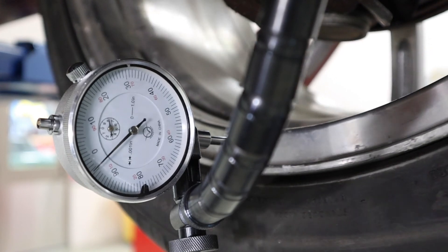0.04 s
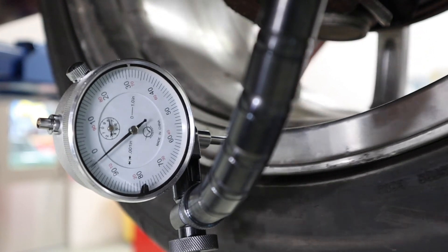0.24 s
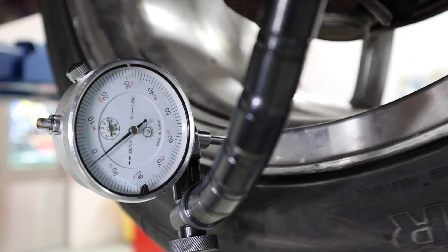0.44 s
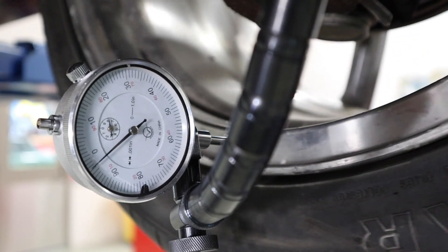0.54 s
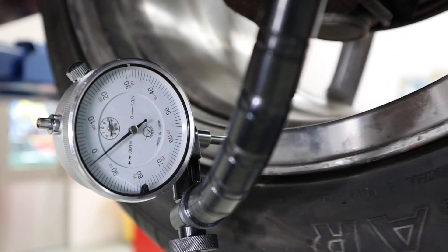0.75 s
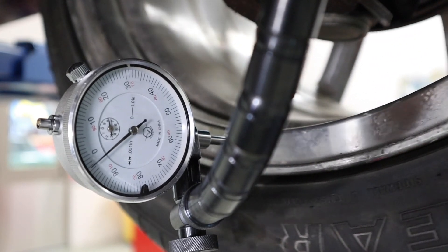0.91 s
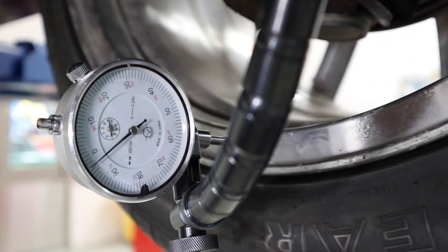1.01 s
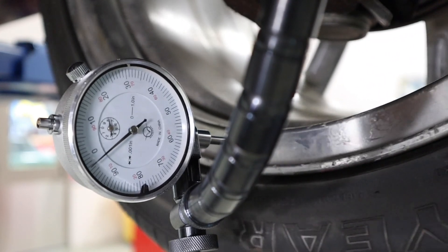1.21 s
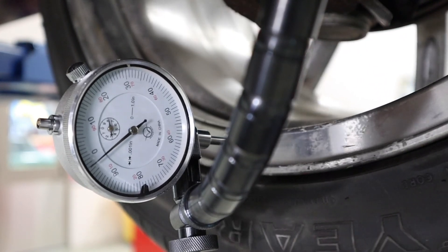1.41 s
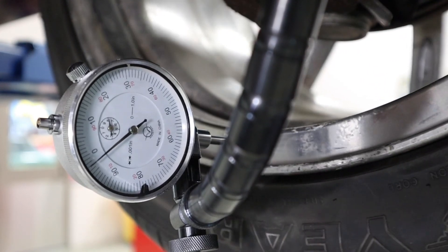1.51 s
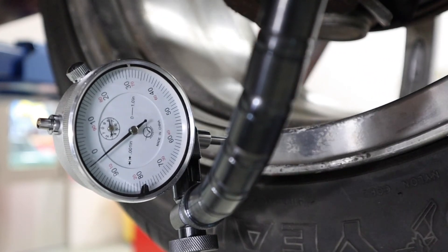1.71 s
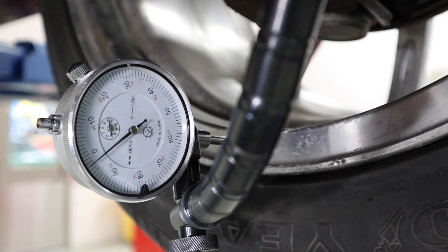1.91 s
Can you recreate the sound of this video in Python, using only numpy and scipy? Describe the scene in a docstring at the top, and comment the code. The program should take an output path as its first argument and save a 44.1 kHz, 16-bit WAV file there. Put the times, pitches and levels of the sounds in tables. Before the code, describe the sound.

Rasping metal scrapes from a hand-turned wheel against a gauge, over a soft low rumble.

```python
"""Car wheel under a dial gauge

A car wheel is turned by hand in a quiet workshop, a dial gauge riding on its rim. Five times the
contact catches and scrapes: stick-slip friction excites the modes of rim and gauge, and hard grains
ping. Around the scrapes the tip ticks over small flaws, while the hub rumbles and rubs softly."""
import sys
import numpy as np
from scipy import signal
from scipy.fft import rfft, irfft
from scipy.io import wavfile

SR = 44100
rng = np.random.default_rng(int(sys.argv[2]) if len(sys.argv) > 2 else 0)


def bounce(signal):
    """Save signal as a 16-bit WAV file at the path given by the first command-line argument."""
    frames = np.transpose(np.atleast_2d(signal))
    limited = np.clip(frames, -1, 1)
    pcm = np.round(limited * 32767).astype(np.int16)
    wavfile.write(sys.argv[1], SR, pcm)


N = 85995
T = np.arange(N) / SR


def scrapes():
    """Forced vibration: friction drives the metal's sharp modes, broad resonances and gritty treble."""
    # broad response of the scraped metal: f/Hz, relative level/dB
    body_spectrum = [(100, -25.5), (420, -18.5), (600, -28), (780, -22.5), (1000, -7), (1140, -21.5),
                     (1340, -4.5), (1620, -8.5), (2000, -5), (2540, -5), (2790, -10), (3050, -7.5),
                     (3700, -13.5), (4480, -9), (5200, -20.5), (6350, -18), (7100, -41.5), (8200, -53.5),
                     (11000, -52), (16000, -67)]
    # spectrum of the fine grit: f/Hz, relative level/dB
    grit_spectrum = [(2000, -18), (4400, 3), (6300, 4), (8000, -25), (9200, -18), (10000, -5),
                     (11000, -13.5), (11900, -1), (12700, -7), (13600, -4), (16000, -16)]
    force, bite, groan, grit = scrape_envelopes()
    pulses, slip_tone = stick_slip()
    metal = metal_modes(force * friction(pulses))
    metal += amp(-22) * colour(force * friction(pulses), body_spectrum)
    metal += resonate(bite * friction(pulses), hz=2163, width_hz=720)
    metal += resonate(groan * friction(pulses), hz=1335, width_hz=177)
    metal += amp(-37) * colour(grit * micro_slips(per_s=7500, spread_db=4), grit_spectrum)
    return metal + amp(-41) * np.sqrt(force) * slip_tone


def scrape_envelopes():
    """Exponential decay and growth: each scrape opens with a harsh bite, then a lower groan builds."""
    # strength of the slipping, one curve per scrape: t/s, level/dB
    curves = [
        [(.24, -4), (.244, -9), (.246, -2), (.266, 0.5), (.274, 0.5), (.342, 0.5), (.357, -3.5), (.368, -20),
         (.40, -19)],
        [(.459, -5), (.482, -4), (.493, -16), (.516, -8)],
        [(.519, -9.5), (.527, -1.5), (.556, 2.5), (.568, -5.5), (.587, 1), (.604, -28), (.63, -34)],
        [(.652, -26), (.661, -4.5), (.678, 1.5), (.714, -0.5), (.728, -5), (.742, -32)],
        [(.764, -6), (.769, -0.5), (.786, 2), (.822, -1), (.865, -1), (.9, -2), (.948, -2), (.966, -10),
         (.99, -22)],
    ]
    # bite and groan relative to that strength, one entry per scrape: level/dB
    bite_levels = [-16, -18, -16.5, -19.5, -22.5]
    groan_levels = [-26, -24, -20, -24, -21.5]
    bite_decay_s, groan_build_s, grit_build_s = .045, .068, .0079
    force, bite, groan, grit = np.zeros((4, N))
    for curve, bite_db, groan_db in zip(curves, bite_levels, groan_levels):
        times, db = np.transpose(curve)
        level = amp(np.interp(T, times, db, left=-120, right=-120))
        age = np.maximum(T - times[0], 0)
        force += level
        bite += level * amp(bite_db) * np.exp(-age / bite_decay_s)
        groan += level * amp(groan_db) * (1 - np.exp(-age / groan_build_s))
        grit += level ** 1.8 * (1 - np.exp(-age / grit_build_s))  # grows faster than the force
    return force, bite, groan, grit


def stick_slip():
    """Relaxation oscillation: one impulse per slip at an unsteady rate, and a tone at that rate."""
    # rate of sticking and slipping: t/s, f/Hz
    slip_rate = [(.24, 480.2), (.29, 447), (.35, 353.6), (.54, 349.1), (.6, 350), (.69, 319.2),
                 (.79, 350.4), (.825, 352.2), (.845, 413.6), (.9, 438.2), (.97, 419.6)]
    hz = np.interp(T, *np.transpose(slip_rate)) * (1 + .07 * wander(rate_hz=200))
    cycles = np.cumsum(hz) / SR
    pulses = np.diff(np.floor(cycles), prepend=0)
    return unit(pulses), unit(np.sin(2 * np.pi * cycles))


def micro_slips(per_s, spread_db):
    """Shot noise: tiny impulses at random instants, a few of them large."""
    size = amp(spread_db * np.minimum(rng.exponential(1, N), 5))
    sign = rng.choice([-1., 1.], N)
    occurs = rng.random(N) < per_s / SR
    return unit(size * sign * occurs)


def friction(pulses):
    """Superposition: random micro-slips and the regular slip pulses add to one force."""
    return unit(micro_slips(per_s=7000, spread_db=2) + amp(-6) * (pulses - pulses.mean()))


def metal_modes(drive):
    """Modal vibration: rim and gauge answer every slip with a sum of damped sinusoids."""
    # modes of rim and gauge: f/Hz, relative level/dB, T60/s
    modes = [(351, -32, .3), (1026.5, -18.5, 0.22), (1249, -12.5, 0.054), (1353, -6.5, 0.07),
             (1392, -8, 0.065), (1486, -13, 0.13), (1799, -13.5, 0.17), (1939, -9, 0.047),
             (1997, -7.5, 0.087), (2120, -20, 0.12), (2290, -28, 0.15), (2475, -8.5, 0.063),
             (2570, -13.5, 0.14), (2960, -18, 0.096), (3113, -12.5, 0.39), (6320, -28, .03)]
    ringing = np.zeros(N)
    for hz, db, t60 in modes:
        decay = np.exp(-np.log(1000) * T / t60)
        response = decay * np.sin(2 * np.pi * (hz * T + rng.random()))
        ringing += amp(db - 22.5) * convolve(drive, response)
    return ringing


def flaw_ticks():
    """Impact excitation: small flaws in the rim flick the gauge tip."""
    # flaws meeting the tip: t/s, drive level/dB
    flaws = [(.048, -31), (.111, -43), (0.158, -41), (.173, -51), (.191, -38), (.206, -37), (1.085, -43),
             (1.196, -39), (1.678, -39), (1.692, -38), (1.734, -38), (1.766, -38), (1.786, -37),
             (1.800, -35), (1.817, -34.5), (1.883, -45)]
    return impacts(flaws, hz=5700, width_hz=1200, decay_s=.0025)


def grain_pings():
    """Brief contact excites high frequencies: hard grains ping as the scrape passes over them."""
    # grains meeting the tip: t/s, drive level/dB
    grains = [(.278, -22), (.33, -17), (.696, -14), (.713, -10.5), (.8405, -9.5), (.8475, -14), (.872, -15),
              (.908, -14), (.935, -11.5)]
    return impacts(grains, hz=11830, width_hz=1500, decay_s=.0007)


def impacts(events, hz, width_hz, decay_s):
    """Transient response: decaying bursts of noise drive one resonance."""
    envelope = sum(amp(db) * (T >= start) * np.exp(-abs(T - start) / decay_s) for start, db in events)
    return resonate(envelope * rng.uniform(-.33, .38, N), hz, width_hz)


def hub_drone():
    """Amplitude and frequency modulation: the low tone of the turning hub wavers at random."""
    # strength of the drone: t/s, level/dB
    drone_levels = [(0, -43), (.22, -50.5), (.27, -39), (.42, -43), (.56, -43), (.63, -37), (.72, -34.5),
                    (.82, -45.5), (.86, -33.5), (.95, -32), (1.1, -44.5), (1.21, -37.5), (1.26, -51.5),
                    (1.46, -46), (1.5, -38), (1.62, -36.5), (1.68, -51.5), (1.85, -35), (1.89, -52)]
    hz = 113.5 * (1 + .052 * wander(rate_hz=22.8))
    cycles = np.cumsum(hz) / SR
    db = np.interp(T, *np.transpose(drone_levels)) + 2.5 * wander(rate_hz=54)
    return amp(db) * unit(np.sin(2 * np.pi * cycles))


def rolling_noise():
    """Broadband noise: the hub rubs softly, strongest in the bass, with a slight flutter in level."""
    # strength of the rolling noise: t/s, level/dB
    rolling_levels = [(0, -39.5), (.2, -38.5), (.6, -35.5), (1.05, -37), (1.3, -40), (1.52, -37.5),
                      (1.72, -40.5), (1.84, -38.5), (1.95, -40.5)]
    # spectrum of rolling and workshop air: f/Hz, relative level/dB
    rolling_spectrum = [(25, -26), (50, -24), (100, -4.5), (200, 0), (420, -15), (700, -11.5), (1000, -17),
                        (1650, -15), (2600, -23), (4000, -30.5), (6000, -39.5), (7500, -45.5), (16000, -54)]
    db = np.interp(T, *np.transpose(rolling_levels)) + wander(rate_hz=39)
    return amp(db) * colour(rng.standard_normal(N), rolling_spectrum)


def reverberation(x):
    """Diffuse field: dense reflections begin after 6 ms, and their treble dies first."""
    # reverberation time of the workshop: f/Hz, T60/s
    decay_times = [(200, 0.61), (1500, 0.29), (5000, 0.26), (14000, 0.17)]
    reflections = rng.standard_normal(SR) * (T[:SR] > .006)
    hz, t, spectra = signal.stft(reflections, SR, nperseg=256)
    decay = np.exp(-np.log(1000) * t / at_frequency(decay_times, hz)[:, None])
    _, tail = signal.istft(spectra * decay, SR, nperseg=256)
    return convolve(x, tail)


def resonate(x, hz, width_hz):
    """Damped oscillator: the wider its band, the shorter it rings."""
    return convolve(x, T * np.exp(-np.pi * width_hz * T) * np.sin(2 * np.pi * hz * T))


def colour(x, spectrum, size=4096):
    """Minimum-phase filter: the Hilbert transform gives the phase from the log magnitude."""
    hz = abs(np.fft.fftfreq(size, 1 / SR))
    log_gain = np.log(amp(at_frequency(spectrum, hz)))
    transfer = np.exp(np.conj(signal.hilbert(log_gain)))
    return convolve(x, np.fft.ifft(transfer).real[:size // 2])


def convolve(x, response):
    """Linear system: convolution with an impulse response scaled to unit energy."""
    return signal.fftconvolve(x, response / np.linalg.norm(response))[:N]


def wander(rate_hz):
    """Random fluctuation: low-passed Gaussian noise of rms 1."""
    low_pass = np.exp(-(np.fft.rfftfreq(N, 1 / SR) / rate_hz) ** 2)
    return unit(irfft(rfft(rng.standard_normal(N)) * low_pass, N))


def at_frequency(points, hz):
    """Interpolation on a logarithmic frequency axis."""
    f, value = np.transpose(points)
    return np.interp(np.log(hz + 1), np.log(f), value)


def amp(db):
    """Amplitude ratio of a level in decibels."""
    return 10 ** (np.asarray(db) / 20)


def unit(x):
    """Normalisation to rms 1."""
    return x / np.sqrt(np.mean(x ** 2) + 1e-20)


def scene():
    """Superposition: the contact sounds and their reverberation, over the turning hub."""
    contact = scrapes() + flaw_ticks() + grain_pings()
    return (contact + amp(-12) * reverberation(contact) + hub_drone() + rolling_noise())[None]


def record(dry):
    """Band limiting: the microphone passes neither the deepest bass nor the highest treble."""
    low_cut_hz, high_cut_hz = 68, 15900
    high_pass = signal.butter(4, low_cut_hz, "high", fs=SR, output="sos")
    low_pass = signal.firwin(511, high_cut_hz, window=("kaiser", 9), fs=SR)
    return signal.oaconvolve(signal.sosfilt(high_pass, dry), low_pass[None], "same")


dry = scene()
out = record(dry)
bounce(out)
```